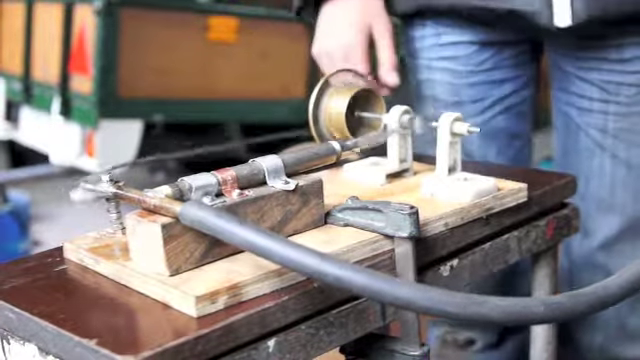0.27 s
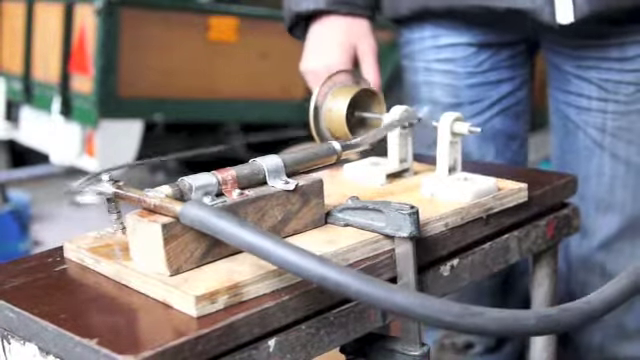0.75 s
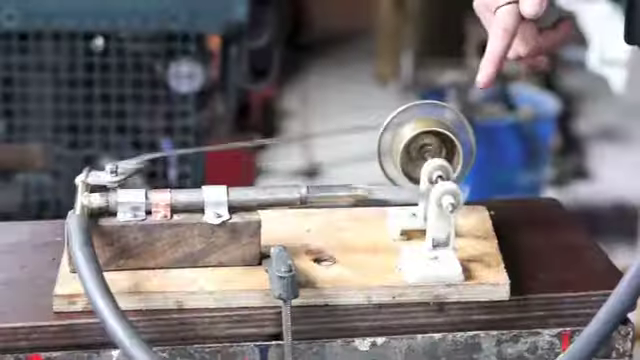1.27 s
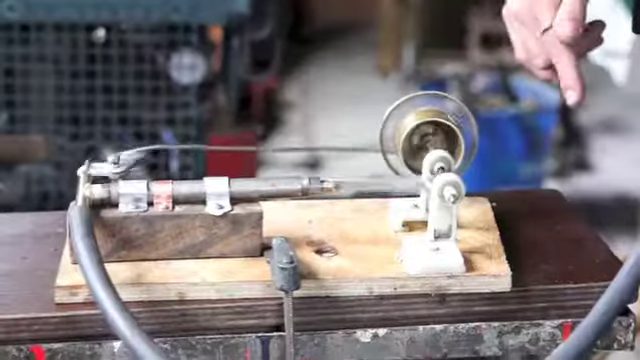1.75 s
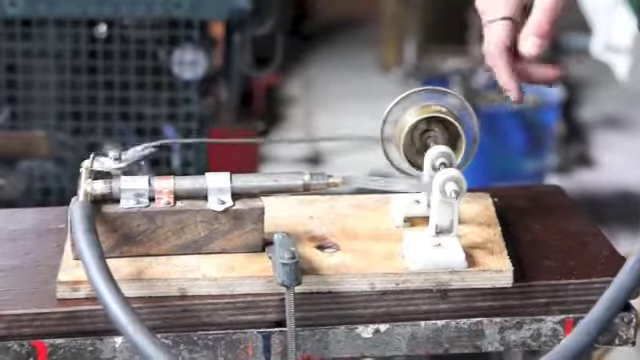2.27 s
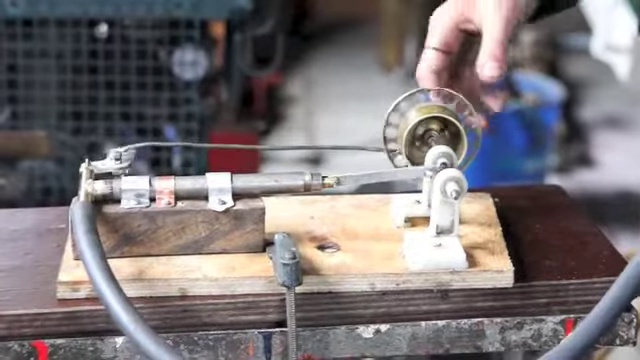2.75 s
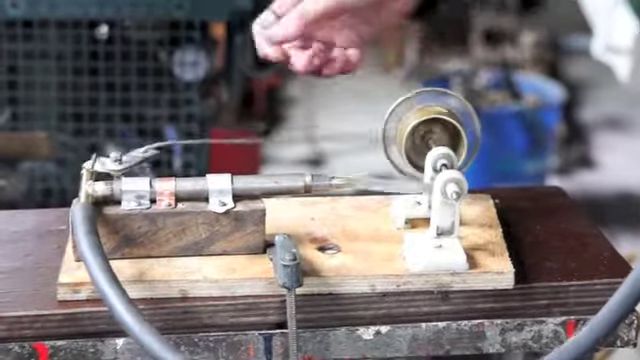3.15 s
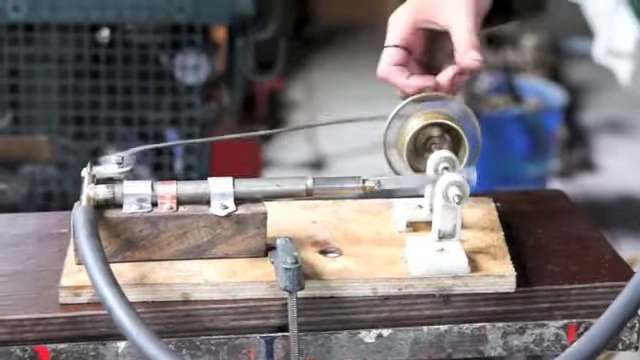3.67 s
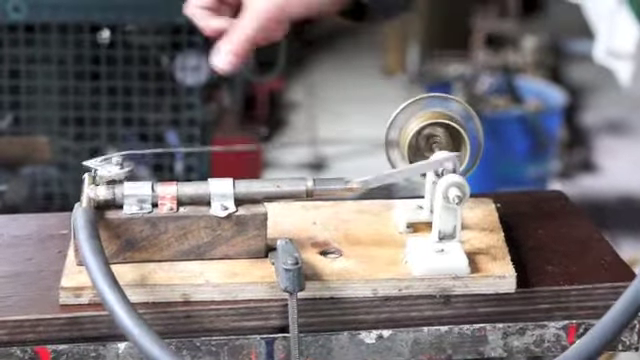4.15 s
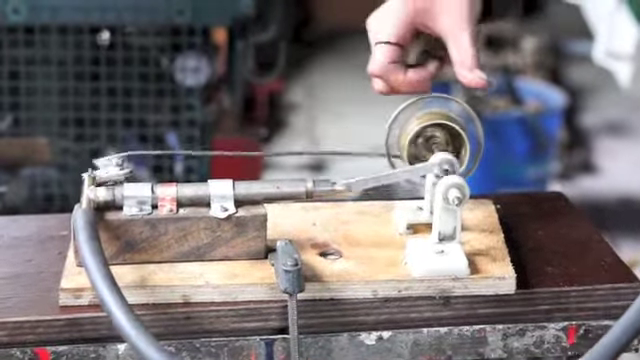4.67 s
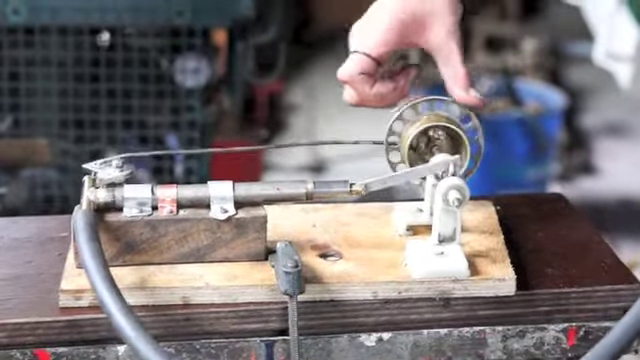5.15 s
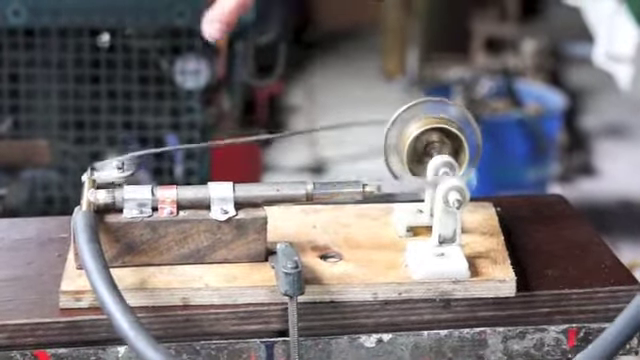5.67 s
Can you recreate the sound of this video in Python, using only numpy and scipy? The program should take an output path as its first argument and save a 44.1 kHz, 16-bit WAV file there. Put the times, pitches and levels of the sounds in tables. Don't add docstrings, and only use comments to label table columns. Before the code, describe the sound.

A homemade air-driven engine on a workshop bench chugs about eight times a second, close and bright, with metal ticks. Just before one second the sound dips briefly and changes to a side position, slower and more hollow. Puffs spread apart, thin squeaks end the strokes, and it stalls twice, restarting each time. Near the end comes a long held airy roar, then quick puffs again. Close stereo microphones, little bass, light room echo.

```python
import sys
import numpy as np
from scipy import signal
from scipy.fft import rfft, irfft, next_fast_len
from scipy.io import wavfile
from scipy.ndimage import uniform_filter1d, map_coordinates

SR = 44100
rng = np.random.default_rng(int(sys.argv[2]) if len(sys.argv) > 2 else 0)


def pcm_store(signal):
    levels = np.round(np.clip(np.atleast_2d(signal), -1, 1) * 32767)
    wavfile.write(sys.argv[1], SR, levels.astype(np.int16).T)


def rack_gain(trim_db):
    fader = np.asarray(trim_db, float)
    return 10 ** (fader / 20)


N = 260180
CHANGE_S, FADE_OUT_S, FADE_IN_S = 0.927, 0.022, 0.024

# exhaust puff in seconds, puff level in dB,
# seconds the valve then stays open, linkage shake in dB, whistle in dB.
TURNS_NEAR = [
    (-.082, -27, 0.0688, -32, -25),
    (0.036, -32, 0.079, -30.5, -27),
    (0.161, -35, 0.08, -33.5, -24.5),
    (0.278, -36, 0.055, -31, -26),
    (0.399, -31, 0.091, -32, -31),
    (0.515, -36, .07, -34, -28),
    (0.645, -35, 0.0755, -31.5, -28.5),
    (0.762, -37.5, 0.083, -36, -27.5),
    (0.898, -70, 0.061, -69, -40),
]
HELD_S = 0.41
TURNS = [(1.02, -30.1, 0.086, -36.5, -29.5), (1.184, -29, 0.073, -35, -32.5),
         (1.355, -29.5, 0.083, -37.5, -35), (1.524, -31.5, 0.078, -36.5, -32.5),
         (1.699, -29.5, 0.089, -36, -36), (1.896, -31.5, 0.097, -34.5, -32), (2.124, -34.5, 0.13, -37, -41),
         (2.401, -33.5, 0.18, -38, -39), (3.067, -32, 0.083, -34.5, -32), (3.267, -34, 0.1, -37, -35),
         (3.463, -33, 0.11, -36, -33), (3.725, -34.5, 0.16, -37.5, -41), (4.166, -34, 0.1, -39.5, -30),
         (4.378, -29.5, .105, -37.5, -35), (4.617, -31.5, .13, -38, -30), (4.945, -37, HELD_S, -37, -39),
         (5.366, -41, 0.068, -39, -47), (5.42, -26.5, 0.063, -34, -32), (5.573, -31.5, .08, -34.5, -32),
         (5.734, -35, 0.075, -35, -37), (5.905, -36, 0.074, -35, -38)]
PUFF_COLUMN, SHAKE_COLUMN, WHISTLE_COLUMN = 1, 3, 4
# start in seconds, level in dB.
AFTER_PUFFS = [
    (3.148, -40),
    (4.51, -51),
    (4.782, -40),
]

USUAL_OPEN_S, FULL_OPEN_S = 0.093, 0.23
BUILD_S, LATEST_PEAK_S = 0.098, 0.098
EARLY_DB, CRACK_OPEN_S = -3.5, 0.053
STANDSTILL_S, FLICKED_LEAD = 0.35, 0.35

# pitch in Hz, level in dB per Hz.
PUFF = [(4000, -32), (5600, -19), (8000, -23), (13500, -18), (14500, -9), (15060, -1), (15450, 1),
        (15800, -4), (16100, -40)]
HISS = [(3000, -30.5), (4500, 5), (6000, 4.5), (9000, 4.5), (12000, 4.5), (14000, 3), (16000, -33)]
PORT_HZ = (2950, 3120, 3570, 4200)
PORT_ECHO = 0.7

# pitch in Hz, width in Hz, level in dB.
TUBES = [(568, 36, -4.5), (726, 4, 3), (1088, 34, -2.5), (2360, 24, -8), (2710, 44, -6), (2876, 26, 5.5),
         (3260, 220, -2), (3505, 18, 10.5), (4201, 36, 5), (4630, 34, -35), (5260, 60, -4),
         (5830, 66, -0.5), (6300, 38, 6.5), (6386, 340, -3.5), (7190, 61, -1.5), (8620, 110, -2.5),
         (9060, 100, -9), (9050, 180, -0.5), (12530, 100, -1.5)]
# pitch in Hz, width in Hz.
TUBE_NULLS = [(3100, 260), (3900, 420)]
TUBE_REST_HZ = 3490
OPENING_HZ, TRAVEL_HZ, SHUTTING_HZ = 3450, 3495, 3570
LAST_TRAVEL_S = 0.05
STILL_WOBBLE, MOVING_WOBBLE = 0.002, 0.011

# pitch in Hz, level in dB per Hz.
BOARD_NEAR = [(24, -70), (40, -67), (217, -17.5), (259, -22), (457, -9), (738, -8.5), (947, -1.5),
              (2260, -4.5), (2800, -6.5), (3640, -9), (6160, -120)]
BOARD = [(24, -68), (40, -40), (149, -41), (228, -7), (288, -15.5), (389, -3), (517, -12.5), (914, -1.5),
         (2520, -4), (2800, -4.5), (3640, -18), (6160, -120)]
# pitch in Hz, width in Hz, level in dB.
BOARD_PEAKS = [(367, 31, 2.5), (626, 40, -34), (905, 13, 17.5), (1590, 13, -80), (1860, 170, 12)]
# pitch in Hz, level in dB per Hz.
RATTLE = [(1800, -22), (2500, -14.5), (3500, 3), (4800, -5.5), (6000, -8.5)]
# start in seconds, level in dB.
JOLTS = [(0.075, -35), (0.107, -30), (.234, -32), (.406, -33.5), (.66, -48), (1.012, -34.5), (1.69, -43),
         (1.94, -32.5), (2.14, -36), (2.44, -34), (3.32, -34.5), (3.755, -33.5), (4.153, -40), (4.425, -32),
         (4.665, -34.5), (4.995, -45), (5.405, -27), (5.61, -33), (5.77, -39)]
JOLT_RISE_S, JOLT_FALL_S = 0.007, 0.029

# pitch in Hz, width in Hz, level in dB, delay in seconds.
THUMPS = [
    (193, 70, -15, 0.026),
    (392.6, 27, -15, 0.0015),
]

# time in seconds, peak level in dB, pitch in Hz,
# left above right in dB.
SQUEAKS = [(1.2624, -40, 6960, 3.0), (1.6019, -38, 6870, 4), (1.7849, -28.5, 7120, 3),
           (1.9978, -20.5, 7130, 4), (2.2441, -20, 7126, 4), (2.5914, -12.5, 7136, 4.5),
           (3.1704, -34, 7210, 2.0), (3.3545, -24.5, 7160, 3), (3.5773, -19, 7140, 4.5),
           (3.8926, -12, 7134, 4.5), (4.2588, -28, 7080, 3), (4.4832, -16.5, 7120, 4.5),
           (4.7485, -14, 7150, 3), (5.8107, -34.5, 7160, 1.5)]
# multiple of its pitch, level in dB.
SQUEAK_PARTIALS = [(1, 3.5), (1.075, -22), (1.499, -15), (1.545, -14.5)]
# multiple of the squeak's pitch, width in Hz,
# level in dB above the gap hiss, seconds it outlasts the squeak.
GAP_BANDS = [(1, 260, -3, 0), (1.52, 400, -1, .04), (2.04, 550, 1, .06)]
GAP_DB, CLOSING_S, CLOSING_FROM_HZ = -49, 0.12, 5900

# time in seconds, peak level in dB.
KNOCKS = [(0.046, -3.5), (0.1, -10), (0.227, -4), (0.403, -13), (0.462, -5.5), (0.624, -11), (0.75, -8),
          (0.84, -9), (1.014, -7.5), (1.34, -9.5), (1.937, -11), (2.138, -25), (2.445, -13), (3.053, -43),
          (3.312, -35), (3.78, -11), (3.862, -42), (4.153, -9.5), (4.421, -10.5), (4.989, -10),
          (5.397, -14), (5.586, -29)]

# times in seconds, then
# pitches in Hz.
CREEP_S = (1.5, 3.03)
CREEP_HZ = (1740, 2070)
CREEP_DB = -52

# pitch in Hz, level in dB per Hz.
LEAK = [(24, -80), (40, -43), (184, -11), (2130, -7), (2350, -3), (4850, -11), (7610, -4.5), (11100, -5),
        (12900, 2), (15700, -3.5)]
LEAK_DB = -37.5
# pitch in Hz, width in Hz, level in dB.
LEAK_PEAKS = [(2354, 67, -0.5), (7400, 260, -12), (7860, 180, -3), (12700, 337, 4)]

# delay in seconds, level in dB.
SHOP_ECHOES = [(0.023, -16.5), (0.034, -15), (.045, -27.5)]
SHOP_T60_S, SHOP_DB = 0.5, -24
SHOP_SIDE = 0.45

# pitch in Hz, likeness from 0 to 1.
LIKENESS = [(60, 0.6), (180, 0.71), (550, 0.53), (1650, 0.78), (4970, 0.74), (15000, 0.44)]
# pitch in Hz, left above right in dB.
LEAN = [(60, 0.0), (180, 0.088), (550, 1.0), (1650, 0.0), (4970, 0.92), (15000, 0.74)]
LOW_CUT_HZ, TOP_HZ = 110, 15760


def rms_one(x):
    return x / np.sqrt(np.mean(x ** 2) + 1e-20)


def at_hz(points, hz):
    point_hz, value = np.transpose(points)
    return np.interp(np.log(hz + 1), np.log(point_hz), value)


def drift(rate):
    r = np.exp(-8 * np.pi * rate / SR)
    noise = rng.standard_normal(N // 4 + 9002)
    slow = signal.lfilter([1], [1, -2 * r, r * r], noise)[9000:]
    return np.interp(np.arange(N) / 4, np.arange(len(slow)), rms_one(slow))


def spread(mid, side, spectrum):
    size = next_fast_len(N)
    hz = np.fft.rfftfreq(size, 1 / SR)
    alike = np.clip(at_hz(LIKENESS, hz), 0, 1)
    mid = rfft(mid, size) * np.sqrt(1 + alike)
    side = rfft(side, size) * np.sqrt(1 - alike)
    lean = rack_gain(at_hz(LEAN, hz) / 2)
    colour = rack_gain(at_hz(spectrum, hz))
    ears = np.array([(mid + side) * lean, (mid - side) / lean])
    return rms_one(irfft(colour * ears, size)[:, :N])


def air(spectrum, grit_db):
    mid, side = rng.standard_normal((2, N)) * rack_gain(grit_db * drift(106))
    return spread(mid, side, spectrum)


def resonate(x, peaks):
    out = 0
    for k, (hz, width, level_db) in enumerate(peaks):
        r, w = np.exp(-np.pi * width / SR), 2 * np.pi * hz / SR
        b = (1 - r * r) / 2 * np.array([1, 0, -1])
        ring = signal.lfilter(b, [1, -2 * r * np.cos(w), r * r], x)
        out = out + (-1) ** k * rack_gain(level_db) * ring
    return out


def stroke(axis, follows, lead, peak_share, puff_db, peak_db, shut_db, builds_db, fall_db, near_db):
    t = np.arange(0, N + 64, 64) / SR
    power = 1e-12
    shut = -1
    for row in np.array(TURNS_NEAR + TURNS):
        s, held = row[0], max(row[2], 0.03)
        end_db = shut_db + builds_db * np.log2(min(held, FULL_OPEN_S) / USUAL_OPEN_S)
        peak = np.clip(peak_share * held, 0.004, min(LATEST_PEAK_S, 0.9 * held))
        early = max(lead, 0.004) / 2 * (FLICKED_LEAD if s - shut > STANDSTILL_S else 1)
        shut = s + held
        early_db = puff_db + EARLY_DB
        built = np.clip(BUILD_S, peak + 0.001, held - 0.001)
        knots = s + np.array([-early - 3 * CRACK_OPEN_S, -early, 0, peak, built, held, held + 1])
        levels = [early_db - 90, early_db, puff_db, peak_db, end_db, end_db, end_db - abs(fall_db)]
        near = s < CHANGE_S
        level_db = np.interp(t, knots, levels) + follows * (row[axis] + 35) + near * near_db
        same_position = (t < CHANGE_S) == near
        power = power + rack_gain(level_db) ** 2 * same_position
    return np.interp(np.arange(N) / SR, t, np.sqrt(power))


def piston(opening, travel, shutting, back):
    s, _, held, *_ = np.transpose(TURNS_NEAR + TURNS)
    shut = s + np.minimum(held, np.append(np.diff(s), 1) - 0.03)
    last_travel = np.maximum(shut - LAST_TRAVEL_S, s + 0.02)
    returned = shut + np.minimum(0.1, 0.6 * (np.append(s[1:], 7) - shut))
    times = np.transpose([s + 0.01, last_travel, shut, returned]).ravel()
    return np.interp(np.arange(N) / SR, times, np.tile([opening, travel, shutting, back], len(s)))


def puff_pressure(delay):
    t = np.arange(N) / SR - delay
    out = np.zeros(N)
    for s, level_db, *_ in TURNS_NEAR + TURNS + AFTER_PUFFS:
        near = slice(max(int((s - 0.1) * SR), 0), int((s + 0.25) * SR))
        late = t[near] - s
        swell = np.where(late < 0, np.exp(-(late / 0.015) ** 2), np.exp(-late / 0.024))
        out[near] += rack_gain(level_db) * swell
    return out


def port_echo(x):
    reading = np.arange(N) - SR / piston(*PORT_HZ)
    once = np.array([map_coordinates(ear, [reading], order=3, mode="mirror") for ear in x])
    return (x + PORT_ECHO * once) / np.sqrt(1 + PORT_ECHO ** 2)


def exhaust():
    after = stroke(axis=PUFF_COLUMN, follows=0.94, lead=0.033, peak_share=0.4, puff_db=-38, peak_db=-75,
                   shut_db=-45, builds_db=3.0, fall_db=44, near_db=13.5)
    broad = stroke(axis=SHAKE_COLUMN, follows=0.49, lead=0.024, peak_share=0.17, puff_db=-42.5, peak_db=-41,
                   shut_db=-37.5, builds_db=-4.0, fall_db=72, near_db=4.5)
    puffs = puff_pressure(0)
    top = air(PUFF, grit_db=1.2) * (rack_gain(0.5) * puffs + after)
    hiss = air(HISS, grit_db=0.0)
    swelling = rack_gain(-3.0) * puffs
    return top + hiss * swelling + port_echo(hiss) * broad * rack_gain(1.6 * drift(25))


def tubes():
    flow = stroke(axis=SHAKE_COLUMN, follows=0.24, lead=0.082, peak_share=0.1, puff_db=-39.5, peak_db=-43,
                  shut_db=-34, builds_db=5.0, fall_db=209, near_db=1.5)
    hz = piston(OPENING_HZ, TRAVEL_HZ, SHUTTING_HZ, SHUTTING_HZ)
    waves = resonate(air([(100, 1.5), (16000, 0)], grit_db=0.9), TUBES)
    for null_hz, width in TUBE_NULLS:
        waves = signal.lfilter(*signal.iirnotch(null_hz, null_hz / width, SR), waves)
    s, _, held, *_ = max(TURNS, key=lambda row: row[2])
    still = np.abs(np.arange(N) / SR - s - held / 2) < held / 2
    wobble = np.where(still, STILL_WOBBLE, MOVING_WOBBLE) * drift(14)
    reading = np.cumsum(hz / TUBE_REST_HZ + wobble)
    waves = np.array([map_coordinates(w, [reading], order=3, mode="mirror") for w in waves])
    return flow * rms_one(waves)


def jolts():
    t, out = np.arange(N) / SR, np.zeros(N)
    for s, level_db in JOLTS:
        near = slice(max(int((s - 0.05) * SR), 0), int((s + 0.2) * SR))
        late = t[near] - s
        swell = np.where(late < 0, np.exp(-(late / JOLT_RISE_S) ** 2), np.exp(-late / JOLT_FALL_S))
        out[near] += rack_gain(level_db) * swell
    return out


def clatter():
    shake = stroke(axis=SHAKE_COLUMN, follows=0.96, lead=0.089, peak_share=0.21, puff_db=-37, peak_db=-35,
                   shut_db=-39, builds_db=-0.6, fall_db=109, near_db=0.6)
    rattle = stroke(axis=SHAKE_COLUMN, follows=0.84, lead=0.048, peak_share=0.12, puff_db=-34, peak_db=-36.5,
                    shut_db=-38, builds_db=2, fall_db=158, near_db=4.5)
    sizes = rack_gain(2.12 * np.minimum(rng.exponential(1, (2, N)), 5)) * rng.choice([-1, 1], (2, N))
    happens = rng.random((2, N)) < 2500 * rack_gain(2.5 * drift(40)) / SR
    contacts = sizes * happens
    rumble = spread(*contacts, BOARD)
    from_side = rack_gain(-0.5) * rumble + rack_gain(-12) * rms_one(resonate(rumble, BOARD_PEAKS))
    from_near = rack_gain(3.5) * spread(*contacts, BOARD_NEAR)
    board = np.where(np.arange(N) < CHANGE_S * SR, from_near, from_side)
    return np.hypot(shake, jolts()) * board + rattle * air(RATTLE, grit_db=3.0)


def thumps():
    shaken = []
    for hz, width, level_db, delay in THUMPS:
        push = air([(100, 0), (900, 0)], grit_db=2.2)
        body = resonate(resonate(push, [(hz, width, 0)]), [(hz, width, 0)])
        shaken.append(rack_gain(level_db) * puff_pressure(delay) * rms_one(body))
    return np.where(np.arange(N) < CHANGE_S * SR, *shaken)


def squeaks():
    out, t = np.zeros((2, N)), np.arange(int(0.04 * SR)) / SR
    first = np.exp(-((t - 0.013) / 0.0057) ** 2)
    second = np.exp(-((t - 0.024) / 0.0036) ** 2)
    sag = 0.0204 * np.exp(-(t / 0.0106) ** 2) + 0.022 / (1 + np.exp((0.019 - t) / 0.0005))
    starts = rng.uniform(0, 2 * np.pi, (len(SQUEAKS), len(SQUEAK_PARTIALS)))
    for (s, peak_db, hz, pan_db), start in zip(SQUEAKS, starts):
        phase = 2 * np.pi * hz * np.cumsum(1 - sag) / SR
        tone = sum(rack_gain(db) * np.sin(k * phase + p) for (k, db), p in zip(SQUEAK_PARTIALS, start))
        ears = rack_gain(peak_db + np.array([[pan_db], [-pan_db]]) / 2)
        at = int((s - 0.009) * SR)
        out[:, at:at + len(t)] += ears * (first + 0.68 * second) * tone
    return out


def closing_gap():
    t, to_go = np.arange(N) / SR, np.ones(N)
    hz = np.mean(np.array(SQUEAKS)[:, 2])
    for s, *_ in SQUEAKS:
        near = (t > s - CLOSING_S) & (t <= s + 0.08)
        to_go[near] = (s - t[near]) / CLOSING_S
    pitch = hz + (CLOSING_FROM_HZ - hz) * to_go
    out = 0
    for k, width_hz, level_db, outlast in GAP_BANDS:
        phase = 2 * np.pi * np.cumsum(k * pitch) / SR
        sounding = (to_go < 1) & (to_go > -outlast / CLOSING_S)
        gate = uniform_filter1d(1.0 * sounding, size=900)
        left, right = (drift(width_hz) * np.cos(phase) + drift(width_hz) * np.sin(phase) for ear in range(2))
        out = out + rack_gain(level_db) * gate * np.array([left, 0.8 * left + 0.45 * right])
    return rack_gain(GAP_DB) * out


def knocks():
    out, t = np.zeros(N), np.arange(int(0.016 * SR)) / SR
    ticks = rng.standard_normal((len(KNOCKS), len(t))) * np.exp(-t / 0.0025)
    for (s, peak_db), tick in zip(KNOCKS, ticks):
        at = int(s * SR)
        out[at:at + len(t)] += rack_gain(peak_db - 10) * tick[:N - at]
    band = signal.butter(2, [700, 9000], "band", fs=SR, output="sos")
    return signal.sosfilt(band, out) * rack_gain([[0.7], [-0.7]])


def whistles():
    wind = air([(100, 0), (16000, 0)], grit_db=1.0)
    high = stroke(axis=WHISTLE_COLUMN, follows=1, lead=0.039, peak_share=1.0, puff_db=-37.5, peak_db=-52.5,
                  shut_db=-44.5, builds_db=-5, fall_db=64, near_db=-0.3)
    middle = stroke(axis=WHISTLE_COLUMN, follows=0.7, lead=0.016, peak_share=0.29, puff_db=-37.5, peak_db=-44,
                    shut_db=-50, builds_db=-13.0, fall_db=180, near_db=2.5)
    low = stroke(axis=SHAKE_COLUMN, follows=1.0, lead=0.068, peak_share=0.5, puff_db=-68, peak_db=-51.5,
                 shut_db=-50, builds_db=2.2, fall_db=66, near_db=9)
    out = 0
    for gain, hz, width in ((high, 10050, 70), (middle, 5980, 250), (low, 2215, 40)):
        line = resonate(resonate(wind, [(hz, width, 0)]), [(hz, width, 0)])
        out = out + gain * rms_one(line)
    return out


def creep():
    t = np.arange(N) / SR
    phase = 2 * np.pi * np.cumsum(np.interp(t, CREEP_S, CREEP_HZ)) / SR
    swell = np.sin(np.pi * np.interp(t, CREEP_S, (0, 1)) ** 2.1)
    return rack_gain(CREEP_DB) * swell * (drift(60) * np.cos(phase) + drift(60) * np.sin(phase))


def leak():
    hiss = air(LEAK, grit_db=0.5)
    return rack_gain(LEAK_DB) * (hiss + resonate(hiss, LEAK_PEAKS))


def shop(x):
    t = np.arange(int(0.6 * SR)) / SR
    mid, side = rng.standard_normal((2, len(t)))
    tail = mid + SHOP_SIDE * side * [[1], [-1]]
    reply = rack_gain(SHOP_DB - 22.0 - 60 * t / SHOP_T60_S) * tail * (t > 0.02)
    reply[:, 0] = 1
    for delay, level_db in SHOP_ECHOES:
        reply[:, int(delay * SR)] += rack_gain(level_db)
    return signal.fftconvolve(x, reply, axes=1)[:, :N]


def scene():
    air_sounds = exhaust() + tubes() + whistles() + closing_gap() + leak() + creep()
    return air_sounds + clatter() + thumps() + shop(squeaks() + knocks())


def band_limit(x):
    return signal.sosfilt(signal.butter(12, 17040, fs=SR, output="sos"), x)


def record(dry):
    t = np.arange(N) / SR - CHANGE_S
    fade = np.clip(np.where(t < 0, -t / FADE_OUT_S, t / FADE_IN_S), 0.016, 1) ** 2
    low_cut = signal.butter(1, LOW_CUT_HZ, "high", fs=SR, output="sos")
    top_cut = signal.ellip(14, 0.5, 75, TOP_HZ, fs=SR, output="sos")
    mix = signal.sosfilt(np.vstack([low_cut, top_cut]), dry * fade)
    return band_limit(mix)


dry = scene()
out = record(dry)
pcm_store(out)
```